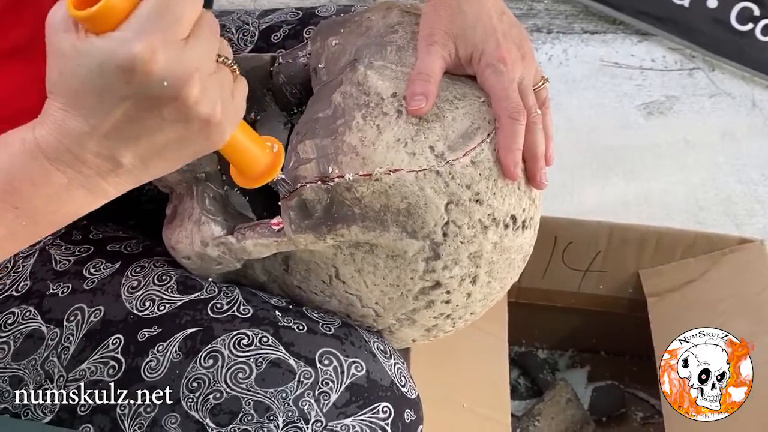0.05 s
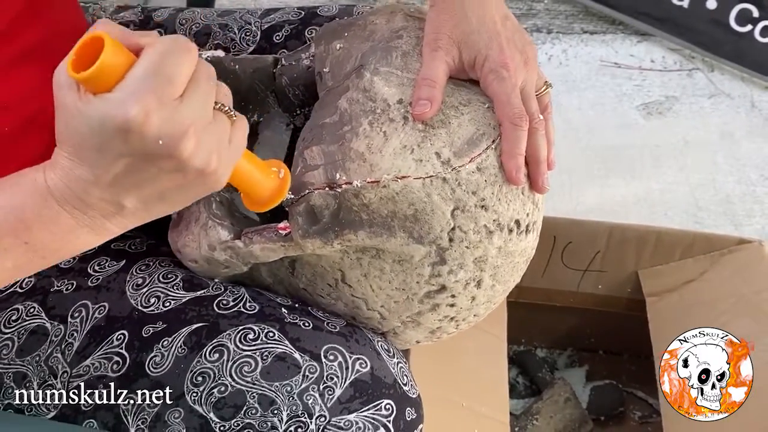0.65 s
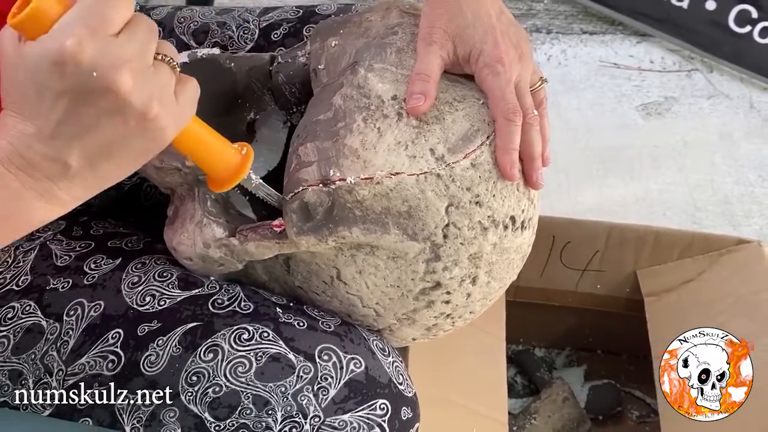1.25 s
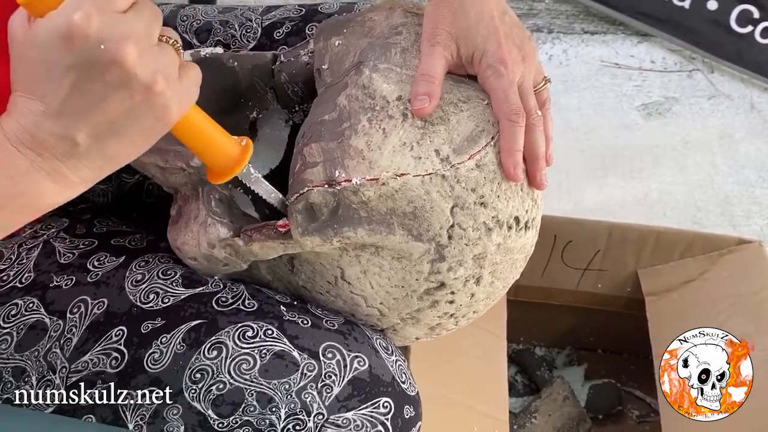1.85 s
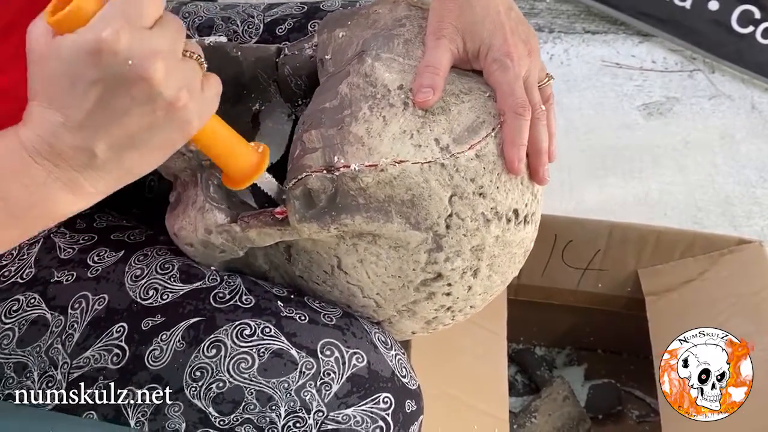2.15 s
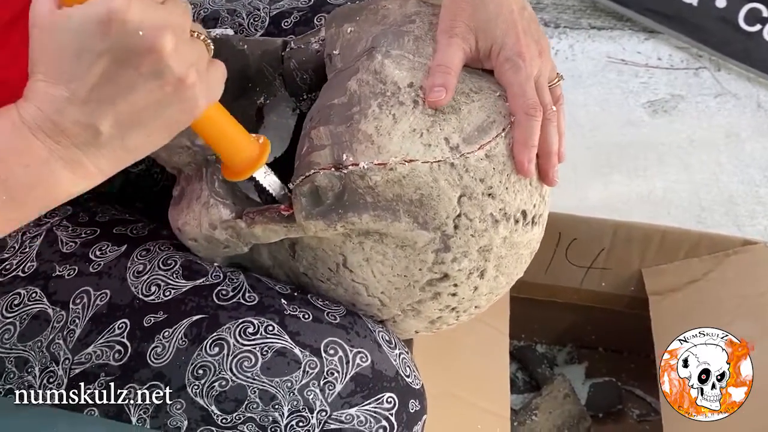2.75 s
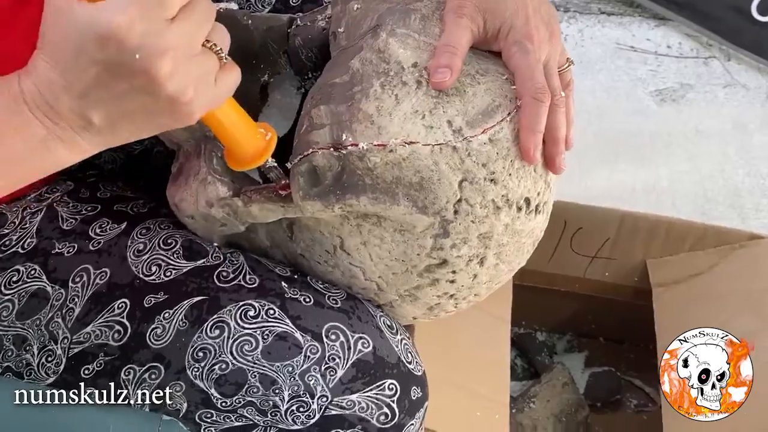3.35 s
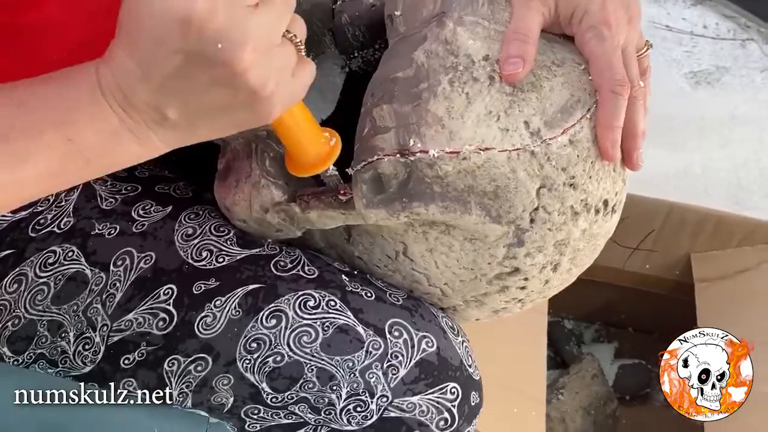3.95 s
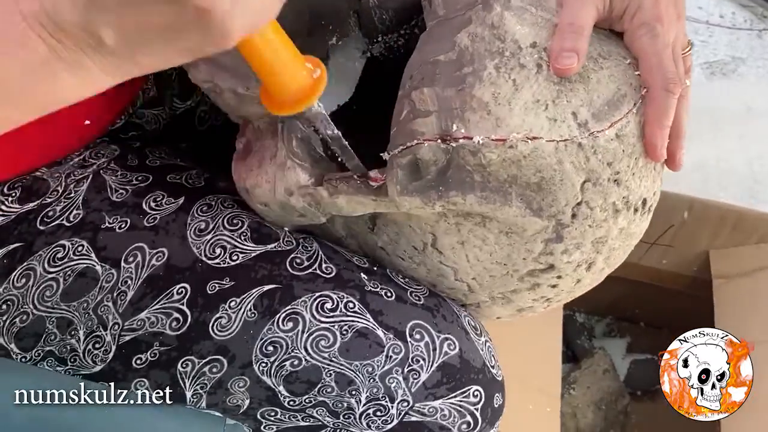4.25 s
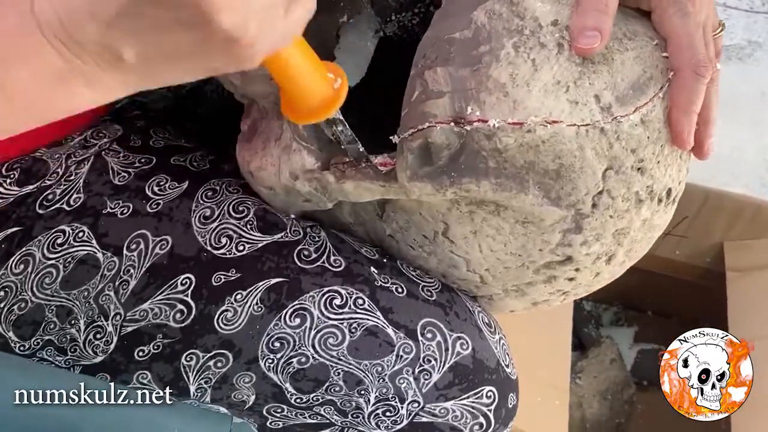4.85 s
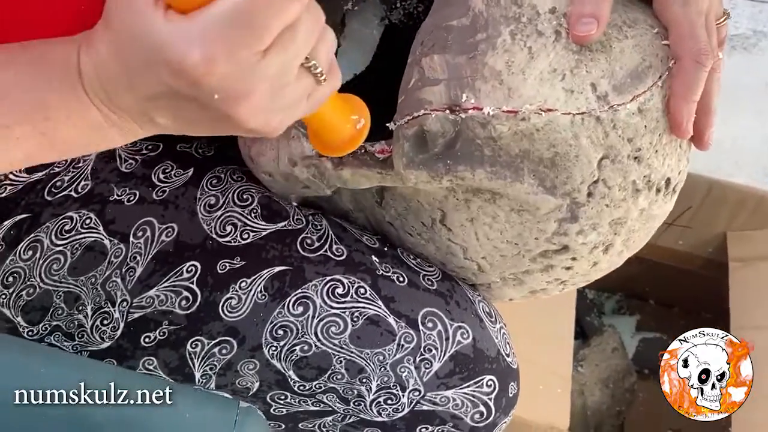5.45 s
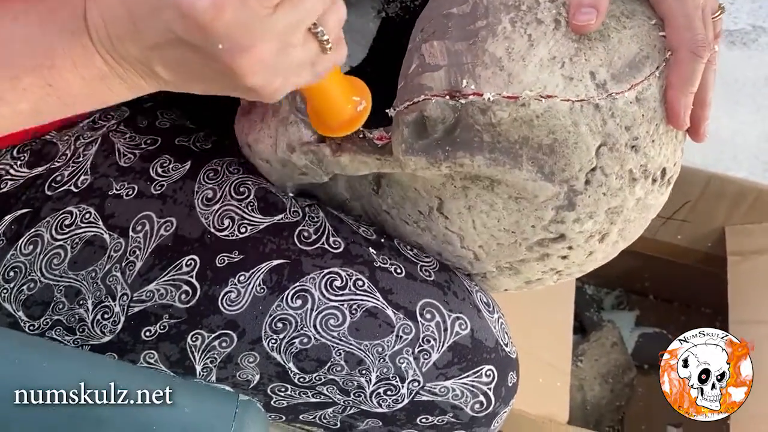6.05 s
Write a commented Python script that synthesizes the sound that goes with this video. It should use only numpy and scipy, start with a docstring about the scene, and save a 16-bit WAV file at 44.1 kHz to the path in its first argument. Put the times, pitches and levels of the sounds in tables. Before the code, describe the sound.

A small serrated blade saws into a hollow foam shell, close to the microphone in a room with soft steady noise. It brushes the cut, bites once, then knocks the rim twice with a tiny steel ping. About fifteen short, uneven strokes follow, each a gritty crunch with a hollow thud, growing loudest near the end. Brittle bits snap, a tooth occasionally squeaks, and a light slide finishes.

```python
"""A small serrated blade saws a hollow foam shell, close by, over soft room noise. The steel first
brushes the cut, bites once at 0.6 s, then knocks the rim twice and pings. From 1.5 to 5.2 s come
fifteen short strokes, loudest near the end: the teeth stick and slip, each slip knocks the shell and
crushes cells, and the flat of the blade rubs. Brittle bits snap; now and then a tooth squeaks.
A last light slide follows at 6 s."""
import sys
import numpy as np
from scipy import signal
from scipy.fft import rfft, irfft, next_fast_len
from scipy.io import wavfile
from scipy.ndimage import uniform_filter1d

SR = 44100
rng = np.random.default_rng(int(sys.argv[2]) if len(sys.argv) > 2 else 0)


def wrap_up_sound(samples):
    """Save the sound to the file named by the first command line argument, as 16-bit audio."""
    columns = np.atleast_2d(samples).T
    # keep every value between -1 and 1, then stretch to whole-number steps
    tamed = np.clip(columns, -1, 1)
    steps = np.round(tamed * 32767).astype(np.int16)
    wavfile.write(sys.argv[1], SR, steps)


N = 272979
TIME_S = np.arange(N) / SR
N_FFT = 2 * next_fast_len(N // 2 + SR // 2, True)
FREQS_HZ = np.fft.rfftfreq(N_FFT, 1 / SR)

# Table levels are relative; each layer adds its own gain.
# room noise spectrum: freq_hz, gain_db
ROOM_SPECTRUM = [(25, -79), (45, -2), (92, 3), (150, -4.5), (300, -8), (520, -8), (720, -13.5),
                 (1200, -16.5), (1750, -18), (2400, -20), (3500, -26), (7000, -32.5), (10000, -42),
                 (16000, -46)]
# room resonances: freq_hz, width_hz, level_db
ROOM_MODES = [(237.5, 13, -56.5), (914.3, 22, -58), (1398, 63, -58), (2110, 130, -62), (2473, 74, -63),
              (2782, 60, -66), (3410, 98, -71)]
# room stereo width: freq_hz, side_minus_mid_db
ROOM_SIDE = [(60, -23), (200, -11.5), (400, -8.5), (700, -5), (1300, -1.5), (2400, -10), (4400, -6),
             (8000, -1)]
# direct sound balance: freq_hz, left_minus_right_db
DIRECT_BALANCE = [(100, 1), (280, 2), (550, 1), (1100, -2.5), (4000, -3), (8000, -4.5), (15000, 3)]
# scatter from nearby surfaces, re direct sound: freq_hz, gain_db
SCATTER_SPECTRUM = [(100, -35), (300, -16.5), (700, -2), (2000, -18), (5000, -5.5), (12000, -9.5)]

# light brushing spectrum: freq_hz, gain_db
BRUSH_SPECTRUM = [(300, -18), (900, -1), (1300, 0.5), (2100, 3.5), (2800, -3.5), (4000, -11.5), (8000, -18),
                  (16000, -31)]
# steel-on-foam hiss spectrum: freq_hz, gain_db
RUB_SPECTRUM = [(300, 5.5), (900, 9), (2000, 6), (4500, 1.5), (7000, 0), (10000, -6), (16000, -2)]
# crushed cell spectrum: freq_hz, gain_db
CRUNCH_SPECTRUM = [(200, -36), (450, 12), (620, 0.5), (780, 8), (1000, -10), (1230, 2.5), (1500, -0.5),
                   (2000, -4.5), (2600, -24.5), (4500, -20), (8000, -55), (16000, -30)]
# brittle crack spectrum: freq_hz, gain_db
CRACK_SPECTRUM = [(100, -69), (500, -15), (1200, 0.5), (3000, 3), (4600, -0.5), (7000, -10.5), (12000, -4),
                  (17000, -12)]
# hollow foam shell: freq_hz, width_hz, shallow_cut_db, deep_cut_db
SHELL_MODES = [(83, 24, 0.5, -4), (171, 79, -5, 0.5), (243.3, 36.6, 0.5, 6.5), (284, 44, 3, -3),
               (418, 84, -6.5, -9.5), (513, 47, -19, -2), (691, 180, -13.5, -22), (744, 85, -13.5, -8),
               (1214, 66, -37, 2.5), (1496, 29, -31, -7.5)]
# stiff wall beside the cut: freq_hz, width_hz, gain_db
WALL_MODES = [(490, 70, 1), (753, 125, -3.5), (1214, 79, 2), (1345, 150, -5.5), (1565, 76, -6),
              (1797, 45, -6), (2046, 130, -6), (2800, 81, -9.5), (3550, 210, -14)]
# steel blade: freq_hz, t60_s, tip_struck_db, heel_struck_db
BLADE_MODES = [(2300, 0.035, -6, -27), (2780, 0.024, -8, -12), (3450, 0.017, 2.5, -19),
               (4360, 0.014, -20, -5), (4790, 0.018, -17, -0.5), (6520, 0.014, -9, -11),
               (6800, 0.015, -8, -7), (7300, 0.015, -20, -4.5), (10950, 0.0066, 1, -7),
               (14600, .008, -7, -6)]

# light slides of the blade: middle_s, half_width_s, brush_db, rub_db
SLIDES = [(0.229, 0.026, -54.5, -62), (0.491, 0.028, -50, -57.5), (0.82, 0.07, -66, -57),
          (1.053, 0.06, -69, -50.5), (2.268, 0.022, -51, -63), (2.86, 0.046, -57, -53),
          (3.055, 0.039, -56, -55), (3.837, 0.03, -53, -63), (3.918, 0.054, -55, -58),
          (4.243, 0.026, -48.5, -56), (4.847, 0.049, -52, -56), (5.06, 0.044, -51, -63),
          (6.023, 0.036, -52, -61)]
# tooth squeaks: start_s, length_s, level_db, start_hz, end_hz
SQUEAKS = [(0.612, 0.037, -44.5, 7100, 7000), (0.619, 0.0074, -30.5, 12900, 10100),
           (2.924, 0.018, -44, 14200, 11950), (4.944, 0.0124, -26, 16200, 14600),
           (4.956, .018, -40, 13900, 11800), (4.969, 0.008, -37.5, 10600, 10200)]
# blade on rim: start_s, ring_db, place (0 tip, 1 heel), crack_db, rap_db, thud_db
RIM_KNOCKS = [(0.784, -23.5, 0.094, -26, 11, 8), (1.013, -24, 0.97, -31, -1.5, 9)]
# brittle snaps: start_s, level_db, ring_hz, crack_re_ring_db
SNAPS = [(0.595, -28.5, 1780, -1.5), (0.815, -53.5, 3470, 13), (1.052, -44, 1490, -1),
         (1.101, -38.5, 1230, -9), (2.032, -43, 12000, 1), (2.068, -38, 1260, -8), (2.473, -37.5, 1300, -7),
         (3.117, -36, 1390, -14), (3.782, -29, 15200, -9.5), (4.0223, -26, 4260, 0.5),
         (4.2788, -31, 1380, -10), (4.511, -35, 11740, -4), (4.6245, -24.5, 1190, -27),
         (4.631, -38, 7000, -11), (4.6583, -22, 13400, -9), (4.6583, -23.5, 6300, 4.5),
         (4.85, -46, 12500, 6), (4.891, -26.5, 1350, -11), (4.903, -32, 4100, -9), (4.9665, -39.5, 4300, 0),
         (5.1045, -29.5, 800, -10)]
# short tears: start_s, level_db, ring_hz, swell_s, crack_re_ring_db
TEARS = [(0.618, -48, 15100, 0.0059, -12), (1.715, -48, 4460, 0.026, -17), (1.7644, -33, 2840, 0.002, -15),
         (1.768, -32, 4400, 0.0026, -7), (2.941, -46, 4730, 0.0052, -2)]
# hard snags, weighted within their stroke: time_s, thud_db, crunch_db
SNAGS = [(0.601, 18, -8), (1.547, 0, 0), (1.564, 3, 2), (2.088, -3, 7), (2.113, 7, 4), (2.556, 7.5, 13.5),
         (2.5714, 1, 13), (2.588, 6, 8), (2.902, 5, -14), (3.134, -6, 10), (3.171, 0, 7), (4.013, -10, 10),
         (4.024, -1, 10.5), (4.303, 3, 4), (4.3286, 9.5, 20), (4.3343, 11.5, 20.5), (4.343, 4, 11),
         (4.3558, 9.5, 14), (4.3624, 7, 14), (4.545, 10, 6), (4.654, 1, 6.5), (4.659, -6, -2),
         (4.669, 4.5, 1), (4.904, 0.5, 10), (4.914, 9, 8), (4.923, 5, 2), (4.931, 1, 1), (4.945, 4, 6),
         (5.111, 3, -11), (5.126, -9, 5), (5.134, -4, 8.5), (5.137, 8, 4), (5.161, 8.5, 9.5)]
# biting strokes: catch_s, end_s, thud_db, crunch_db, rub_db, slip_hz, cut_depth (0-1),
# shell_pitch_ratio, shell_tilt_db_per_octave
STROKES = [(0.597, 0.652, -33.5, -48, -41.5, 232, 0.29, 1.01, 1.5),
           (1.523, 1.572, -30.5, -40.5, -43, 238, 0.3, 1.01, 3),
           (1.75, 1.798, -38.5, -42.5, -42.5, 229.5, 1, 1.06, -6.5),
           (2.063, 2.141, -34.5, -44, -44.5, 219.7, 0.4, 1, 1),
           (2.288, 2.367, -38.5, -48, -46.5, 232, 0.6, 1.03, -1.5),
           (2.551, 2.611, -34, -37, -43, 237, 0.2, 0.96, 6),
           (2.696, 2.733, -49, -47, -48.5, 227, 0.66, 1.04, -10),
           (2.879, 2.93, -39.5, -49.5, -46, 185, 0.54, 0.86, 0),
           (3.132, 3.187, -31.5, -35.5, -40.5, 248.5, 0.21, 1.083, -0.5),
           (3.735, 3.786, -31.5, -39.5, -44, 266, 0.54, 1.08, -6),
           (3.996, 4.051, -28.5, -31.5, -39, 245, 0.62, 1.02, -1),
           (4.281, 4.389, -21.5, -30.5, -42, 169, 0.88, 1, 1),
           (4.516, 4.603, -36, -37, -43, 274, 0.5, 1.09, -4),
           (4.623, 4.702, -27.5, -29.5, -39.5, 233, 0.59, 1.01, 0.5),
           (4.888, 4.983, -24, -28.5, -43, 250, 0.79, 0.96, -1),
           (5.105, 5.195, -29, -34, -40.5, 317, 0.5, 1.044, 3.5)]

SKIM_S = 0.018  # teeth skim ahead of the first catch
SNAP_DECAY_S = 0.0057  # for a ring at 1 kHz
SNAP_DEPTH = 0.54  # cut depth for snaps and rim knocks


def undb(db):
    """Decibels to gain."""
    return 10 ** (np.asarray(db) / 20)


def unit(x):
    """Scale to rms 1."""
    return x / np.sqrt(np.mean(x ** 2) + 1e-18)


def at_level(sound, count, db):
    """Scale so the first count samples have an rms of db."""
    return sound * undb(db) / np.sqrt(np.mean(sound[:count] ** 2) + 1e-18)


def add(track, start_s, sound):
    """Mix a sound into a track."""
    start = int(start_s * SR)
    track[start:start + len(sound)] += sound[:N - start]


def gains(points):
    """Gain per FFT bin from (freq_hz, gain_db) points."""
    hz, db = np.transpose(points)
    return undb(np.interp(np.log(FREQS_HZ + 1), np.log(hz + 1), db))


def filtered(x, response):
    """Apply a frequency response."""
    return irfft(rfft(x, N_FFT) * response)[..., :N]


def colour(x, points):
    """Minimum-phase filter through (freq_hz, gain_db) points; attacks stay sharp."""
    cepstrum = irfft(np.log(gains(points)))
    cepstrum[1:N_FFT // 2] *= 2
    cepstrum[N_FFT // 2 + 1:] = 0
    return filtered(x, np.exp(rfft(cepstrum)))


def resonate(x, hz, width_hz):
    """One resonance, gain 1 at its centre."""
    return signal.lfilter(*signal.iirpeak(min(hz, .45 * SR), hz / width_hz, SR), x)


def waver(window_samples):
    """Twice-smoothed noise, rms 1."""
    smooth = uniform_filter1d(rng.standard_normal(N), window_samples)
    return unit(uniform_filter1d(smooth, window_samples))


def swell(middle_s, half_width_s):
    """Gaussian envelope of a slide."""
    return np.exp(-((TIME_S - middle_s) / half_width_s) ** 2)


def grit(spread_db):
    """Dense cell ruptures: mostly tiny, a few large."""
    return unit(rng.standard_normal(N) * undb(spread_db * np.minimum(rng.exponential(size=N), 5)))


def room_noise(noise_db, drone_db, left_db):
    """Steady diffuse noise with faint resonances, in stereo."""
    def air():
        drone = sum(undb(db + drone_db) * unit(resonate(rng.standard_normal(N), hz, width_hz))
                    for hz, width_hz, db in ROOM_MODES)
        return drone + undb(noise_db) * unit(colour(rng.standard_normal(N), ROOM_SPECTRUM))
    mid = air()
    side = filtered(air(), gains(ROOM_SIDE))
    return np.array([(mid + side) * undb(left_db / 2), (mid - side) * undb(-left_db / 2)])


def reflections(x, t60_s, delay_s):
    """Diffuse tail of unit energy, independent per channel."""
    t = TIME_S[:SR // 2]
    tail = rng.standard_normal((2, len(t))) * np.exp(-np.log(1000) * t / t60_s) * (t > delay_s)
    tail /= np.sqrt(np.sum(tail ** 2, axis=1, keepdims=True))
    return filtered(x, rfft(tail, N_FFT))


def brushing(gain_db):
    """At a light touch the blade only brushes the sides of the cut."""
    touch = sum(undb(db + gain_db) * swell(middle_s, half_s) for middle_s, half_s, db, _ in SLIDES)
    return touch * unit(colour(grit(spread_db=2.5), BRUSH_SPECTRUM))


def friction_db(rest_db, rise_db_per_s, fall_db_per_s):
    """Rub level: wavers at rest, swells in slides, builds with blade speed, dies as the hand turns."""
    gain = undb(rest_db + 2.5 * waver(4000))
    gain += sum(undb(db) * swell(middle_s, half_s) for middle_s, half_s, _, db in SLIDES)
    for catch_s, end_s, _, _, peak_db, *_ in STROKES:
        along = (TIME_S - catch_s) / (end_s - catch_s)
        arch_db = np.interp(along, [0, 0.41, 1], [-4.5, 0, -7.5])
        before_db = rise_db_per_s * np.maximum(catch_s - TIME_S, 0)
        after_db = fall_db_per_s * np.maximum(TIME_S - end_s, 0)
        gain = np.maximum(gain, undb(peak_db + arch_db - before_db - after_db))
    return 20 * np.log10(gain)


def rubbing(rub_db, gain_db, spread_db, flutter_db=2, bite_db=-52.5):
    """Steel on foam: gritty hiss that stutters with the grip; below bite_db the edge glides."""
    stutter = undb(flutter_db * waver(150))
    hiss = unit(colour(grit(spread_db) * stutter, RUB_SPECTRUM))
    bite = 1 / (1 + undb(bite_db - rub_db) ** 2)
    return hiss * bite * undb(rub_db + gain_db)


def squeaking(gain_db, flutter_db, wander_share):
    """A tooth sings in the foam: a rough tone gliding with blade speed."""
    out = np.zeros(N)
    for start_s, length_s, db, start_hz, end_hz in SQUEAKS:
        along = np.linspace(0, 1, int(length_s * SR))
        wander, flutter = unit(uniform_filter1d(rng.standard_normal((2, 4096)), 14))[:, :len(along)]
        hz = (start_hz + (end_hz - start_hz) * along) * (1 + wander_share * wander)
        envelope = undb(db + gain_db + flutter_db * flutter) * np.sin(np.pi * along) ** 2
        add(out, start_s, envelope * np.sin(2 * np.pi * np.cumsum(hz) / SR))
    return out


def soften(push, contact_hz):
    """A soft contact low-passes the force."""
    return signal.sosfilt(signal.butter(2, contact_hz, fs=SR, output="sos"), push)


def shell(push, contact_hz, depth, pitch_ratio=1, tilt_db_per_octave=0):
    """The hollow shell rings briefly; cut depth reweights its modes, grip shifts and tilts them."""
    force = soften(push, contact_hz)
    out = np.zeros(len(push))
    for k, (hz, width_hz, shallow_db, deep_db) in enumerate(SHELL_MODES):
        octaves = np.log2(hz / SHELL_MODES[0][0])
        db = shallow_db + depth * (deep_db - shallow_db) + tilt_db_per_octave * octaves
        polarity = (-1) ** k  # neighbouring modes swing opposite ways
        out += polarity * undb(db) * resonate(force, hz * pitch_ratio, width_hz)
    return out


def wall(push, contact_hz, pitch_ratio=1, scatter_db=0):
    """The stiff wall gives a dry rap; its modes vary with grip and blade position."""
    force = soften(push, contact_hz)
    place_db = scatter_db * rng.standard_normal(len(WALL_MODES))
    return sum((-1) ** k * undb(db + place_db[k]) * resonate(force, hz * pitch_ratio, width_hz)
               for k, (hz, width_hz, db) in enumerate(WALL_MODES))


def rim_knocks(rattle_db, click_decay_s, crack_decay_s, foam_lag_s):
    """The blade strikes the rim: click, crack and steel ping, then the foam knocks."""
    rings, clicks, cracks, rattles, raps, jolts = np.zeros((6, N))
    t = TIME_S[:4096]
    for start_s, ring_db, place, crack_db, rap_db, thud_db in RIM_KNOCKS:
        for hz, t60_s, tip_db, heel_db in BLADE_MODES:
            mode_db = ring_db + tip_db + place * (heel_db - tip_db)
            decay = np.exp(-np.log(1000) * t / t60_s)
            add(rings, start_s, undb(mode_db) * decay * np.sin(2 * np.pi * hz * t))
        noise = rng.standard_normal((3, len(t)))
        bright = np.diff(noise[2], prepend=0)
        add(clicks, start_s, undb(crack_db + 2) * np.exp(-t / click_decay_s) * bright)
        add(cracks, start_s, undb(crack_db) * np.exp(-t / crack_decay_s) * 2 * noise[0])
        add(rattles, start_s, undb(crack_db + rattle_db) * np.exp(-t / (2 * SNAP_DECAY_S)) * noise[1])
        late = int((start_s + foam_lag_s) * SR)
        raps[late], jolts[late] = undb(rap_db), undb(thud_db)
    knock = wall(raps, contact_hz=2600) + shell(jolts, contact_hz=2000, depth=SNAP_DEPTH)
    return rings + clicks + colour(cracks, CRACK_SPECTRUM) + colour(rattles, CRUNCH_SPECTRUM) + knock


def snapping(snap_swell_s, ring_q, rattle_db, thud_db):
    """Brittle bits crack, ring and jolt the shell; tears swell more slowly; the foam rattles on."""
    cracks, rings, rattles, jolts = np.zeros((4, N))
    t = TIME_S[:8192]
    snaps = [(start_s, db, hz, snap_swell_s, SNAP_DECAY_S * (hz / 1000) ** -0.37, crack_db)
             for start_s, db, hz, crack_db in SNAPS]
    tears = [(start_s, db, hz, swell_s, swell_s, crack_db)
             for start_s, db, hz, swell_s, crack_db in TEARS]
    for start_s, db, hz, swell_s, decay_s, crack_db in snaps + tears:
        rise = undb(db) * np.minimum(t / swell_s, 1)
        fall = np.exp(-np.maximum(t - swell_s, 0) / decay_s)
        noise = rng.standard_normal((3, len(t)))
        add(rings, start_s, rise * fall * unit(resonate(noise[0], hz, hz / ring_q)))
        add(cracks, start_s, rise * fall ** 2 * undb(crack_db) * 2 * noise[1])
        add(rattles, start_s, rise * np.sqrt(fall) * undb(crack_db + rattle_db) * noise[2])
        jolts[int((start_s + swell_s) * SR)] = undb(db + crack_db + thud_db)
    thuds = shell(jolts, contact_hz=2000, depth=SNAP_DEPTH)
    return rings + colour(cracks, CRACK_SPECTRUM) + colour(rattles, CRUNCH_SPECTRUM) + thuds


def crush(slips, spectrum, decay_s):
    """Each slip bursts a short cluster of cells; rms 1."""
    energy = signal.lfilter([1], [1, -np.exp(-2 / (decay_s * SR))], slips ** 2)
    return unit(colour(np.sqrt(energy) * grit(spread_db=3), spectrum))


def stick_slip(jitter_periods, scatter_db, skew_db):
    """Teeth skim, catch, then slip unevenly between snags. Two impulse rows: thud, crunch."""
    slips = np.zeros((2, N))
    tooth_db, catch_db = np.array([[-3], [-5.5]]), (0.5, -1.5)  # each: thud, crunch
    for catch_s, end_s, _, _, _, slip_hz, *_ in STROKES:
        start_s = catch_s - SKIM_S
        snags = np.array([(catch_s, *catch_db)] + [row for row in SNAGS if catch_s < row[0] < end_s])
        anchors_s = np.r_[start_s, snags[:, 0], end_s]
        times_s = np.concatenate([np.linspace(a, b, max(round((b - a) * slip_hz), 1) + 1)[1:-1]
                                  for a, b in zip(anchors_s, anchors_s[1:])])
        chance = rng.standard_normal((60, 3))[:len(times_s)].T
        along = (times_s - start_s) / (end_s - start_s)
        times_s += jitter_periods * chance[0] / slip_hz
        force = np.sin(np.pi * along) ** .7 * undb(tooth_db + scatter_db * chance[1:])
        # cells crumble early; the shell swings more as the blade binds
        skew = undb(skew_db * np.array([along - .5, .5 - along]))
        slips[:, (times_s * SR).astype(int)] = force * skew
        slips[:, (snags[:, 0] * SR).astype(int)] = undb(snags[:, 1:].T)
    return slips


def sawing(thud_gain_db, crunch_gain_db):
    """Slips knock the shell, rap the wall and crush cells, with a new grip per stroke."""
    pushes, bursts = stick_slip(jitter_periods=.2, scatter_db=3.8, skew_db=5)
    cells = undb(-3) * crush(bursts, CRUNCH_SPECTRUM, decay_s=.0016)
    cells += undb(-14) * crush(bursts, CRACK_SPECTRUM, decay_s=.0006)
    rap_rms = np.std(wall(bursts, contact_hz=2600))
    ring_out = (0, SR // 10)
    out = np.zeros(N)
    for catch_s, end_s, thud_db, crunch_db, _, _, depth, pitch_ratio, tilt_db_per_octave in STROKES:
        start_s = catch_s - SKIM_S
        a, b = int(start_s * SR), int(end_s * SR)
        thud = shell(np.pad(pushes[a:b], ring_out), contact_hz=665, depth=depth,
                     pitch_ratio=pitch_ratio, tilt_db_per_octave=tilt_db_per_octave)
        crunch = wall(np.pad(bursts[a:b], ring_out), contact_hz=2550,
                      pitch_ratio=pitch_ratio ** 0.46, scatter_db=2.5) / rap_rms
        add(crunch, 0, cells[a:b + 256])
        add(out, start_s, at_level(thud, b - a, thud_db + thud_gain_db))
        add(out, start_s, at_level(crunch, b - a, crunch_db + crunch_gain_db))
    return out


def scene():
    """The cut lies slightly right, so the left channel lags; lap, shell and room scatter it."""
    rub_db = friction_db(rest_db=-56.5, rise_db_per_s=192, fall_db_per_s=370)
    cut = sawing(thud_gain_db=1, crunch_gain_db=-2.17)
    cut += snapping(snap_swell_s=0.00063, ring_q=8, rattle_db=7, thud_db=43.5)
    cut += rim_knocks(rattle_db=-6.5, click_decay_s=0.0007, crack_decay_s=0.002, foam_lag_s=0.00092)
    cut += squeaking(gain_db=2.5, flutter_db=2.9, wander_share=.045)
    cut += rubbing(rub_db, gain_db=3.5, spread_db=3)
    cut += brushing(gain_db=5)
    lean, left_lag_s = np.sqrt(gains(DIRECT_BALANCE)), .00003
    left = filtered(cut, lean * np.exp(-2j * np.pi * FREQS_HZ * left_lag_s))
    right = filtered(cut, 1 / lean)
    # cells break all along the blade: part of the hiss is independent per channel
    wide_hiss = np.array([rubbing(rub_db, gain_db=2.5, spread_db=5.5) for _ in range(2)])
    scatter = reflections(colour(cut, SCATTER_SPECTRUM), t60_s=.025, delay_s=.0008)
    reverb = undb(-17.5) * reflections(cut, t60_s=.14, delay_s=.0065)
    room = room_noise(noise_db=-44, drone_db=-0.5, left_db=0.24)
    return np.array([left, right]) + wide_hiss + scatter + reverb + room


def record(dry):
    """The phone cuts the top with a steep low-pass."""
    cutoff_hz = 16100
    return signal.sosfilt(signal.ellip(10, .2, 70, cutoff_hz, fs=SR, output="sos"), dry)


dry = scene()
out = record(dry)
wrap_up_sound(out)
```